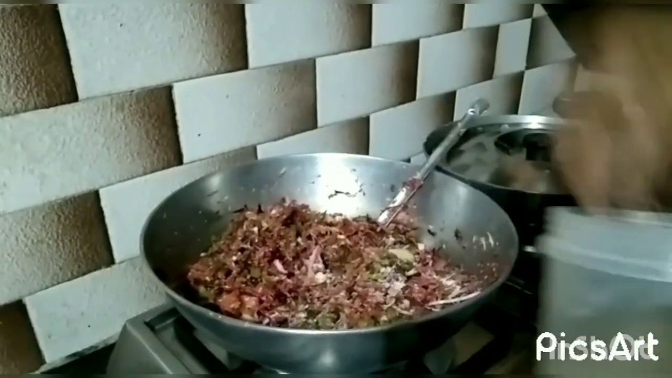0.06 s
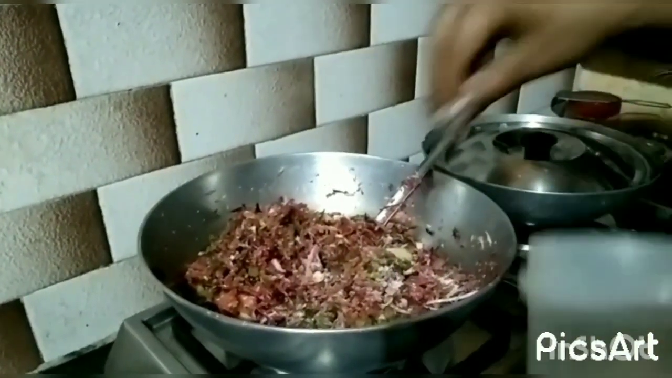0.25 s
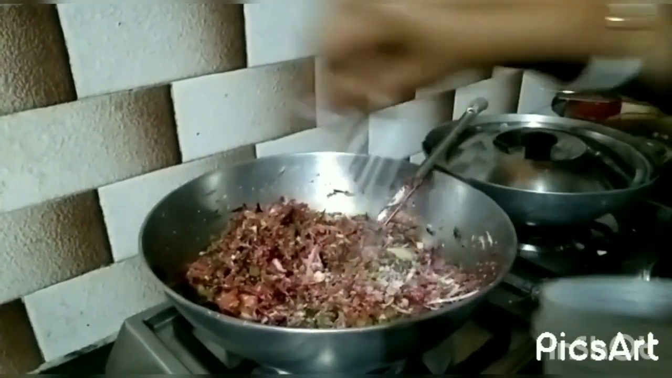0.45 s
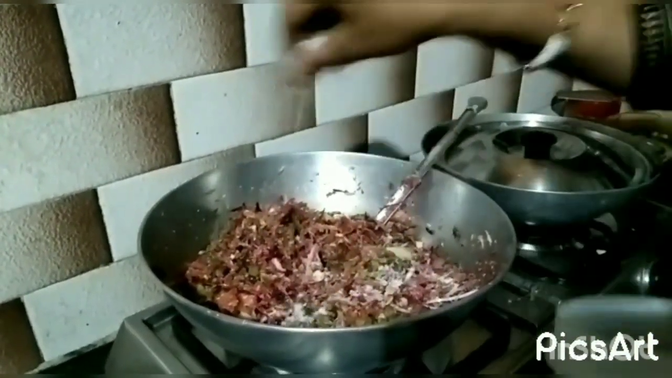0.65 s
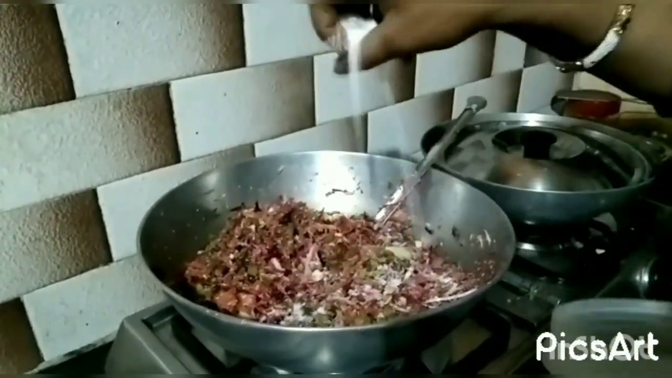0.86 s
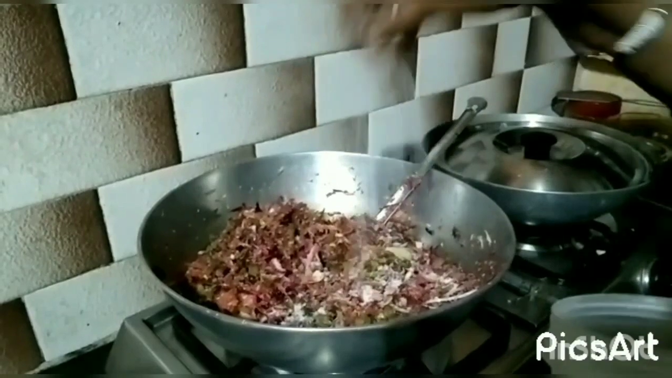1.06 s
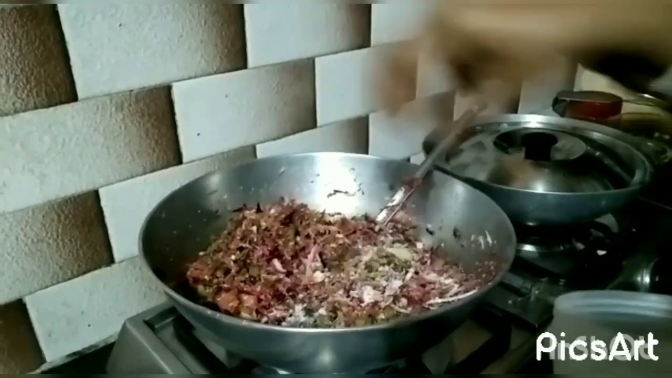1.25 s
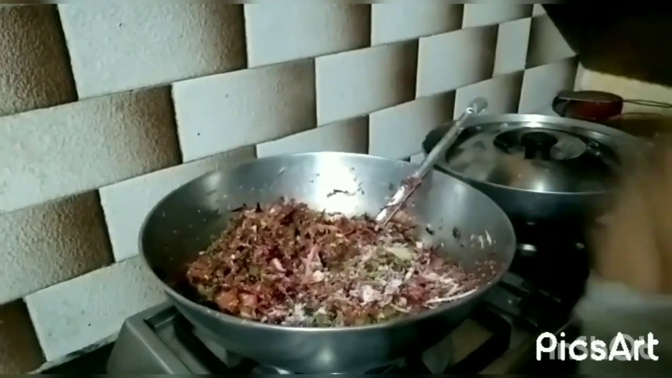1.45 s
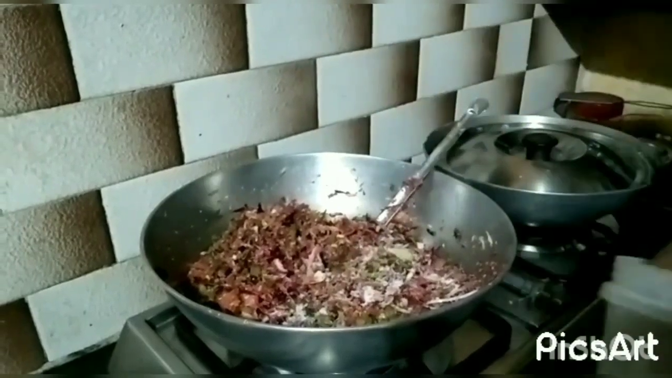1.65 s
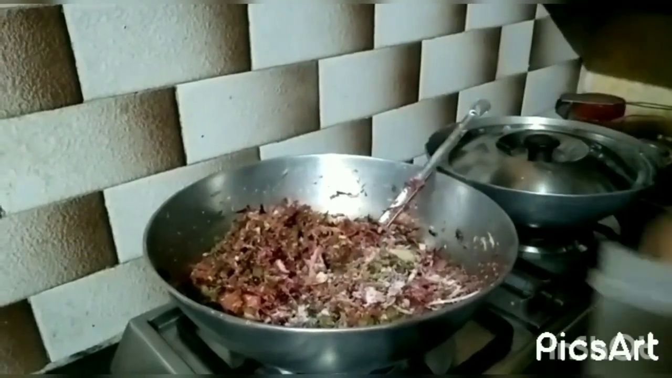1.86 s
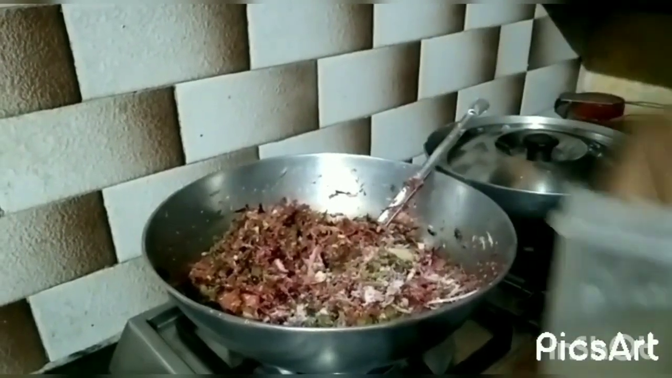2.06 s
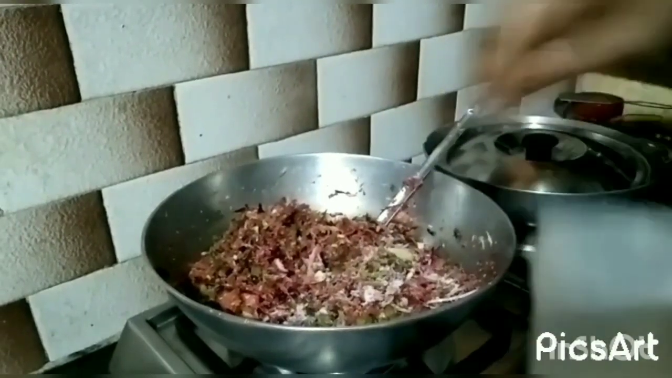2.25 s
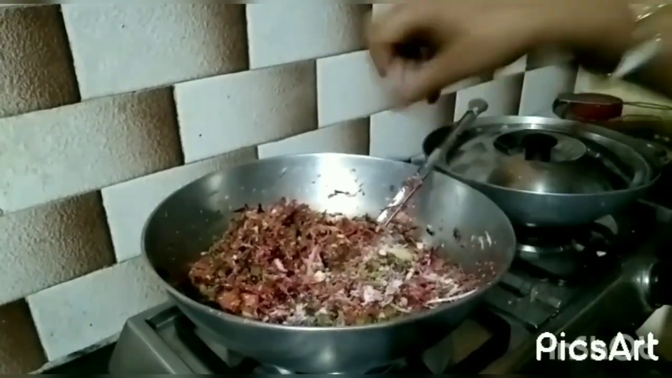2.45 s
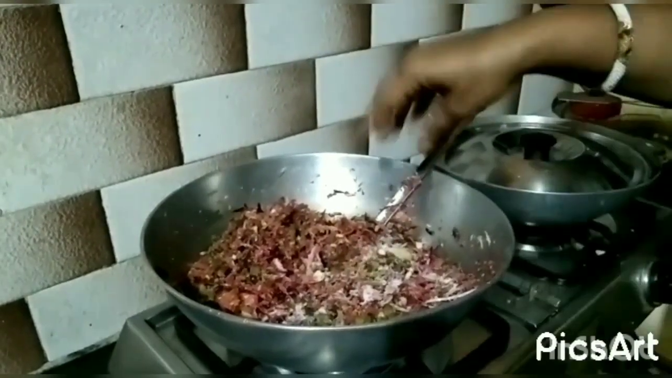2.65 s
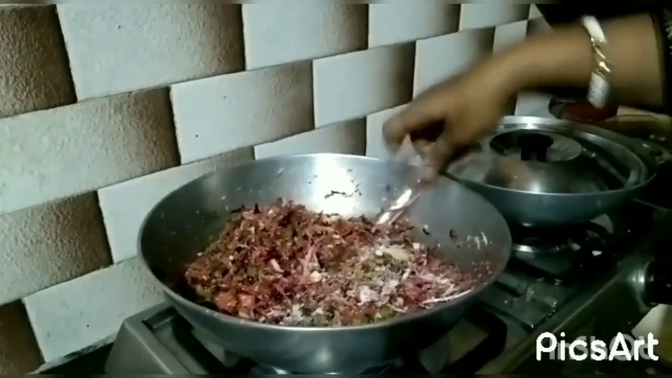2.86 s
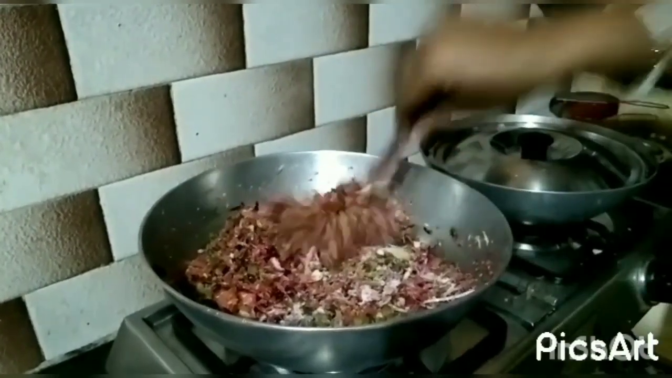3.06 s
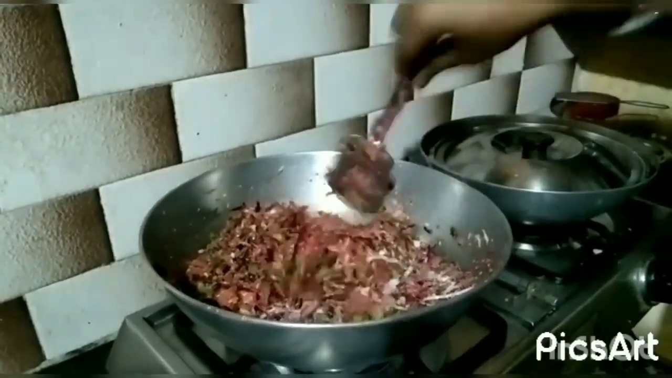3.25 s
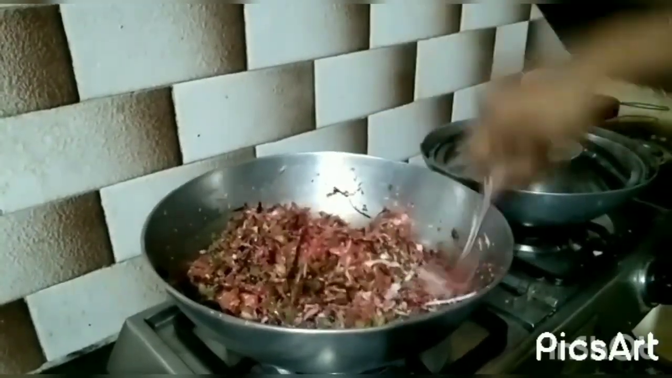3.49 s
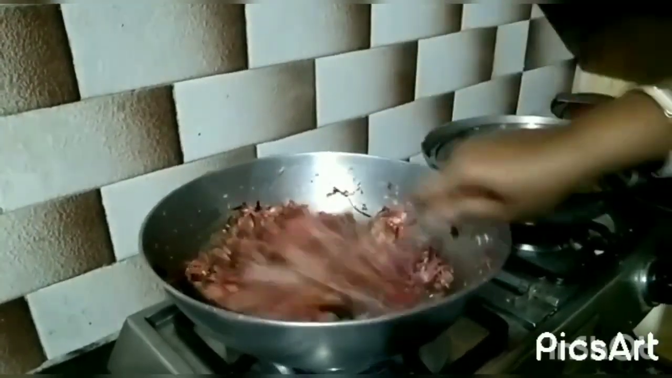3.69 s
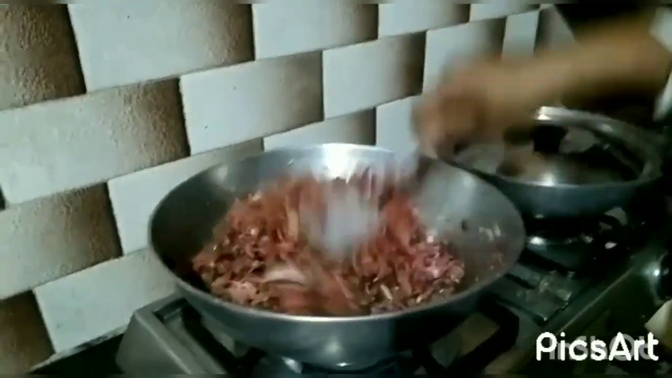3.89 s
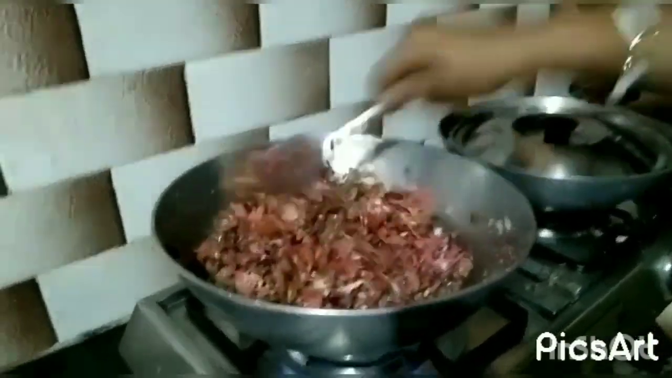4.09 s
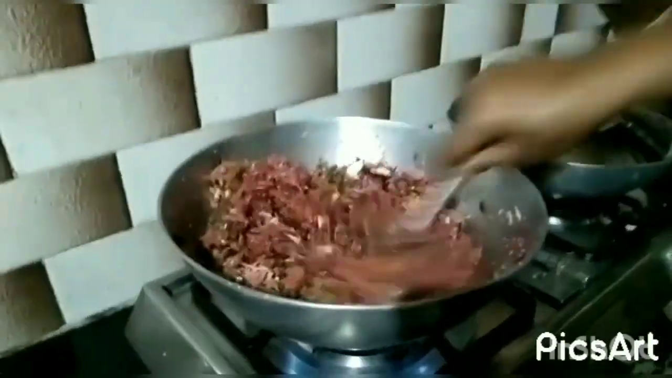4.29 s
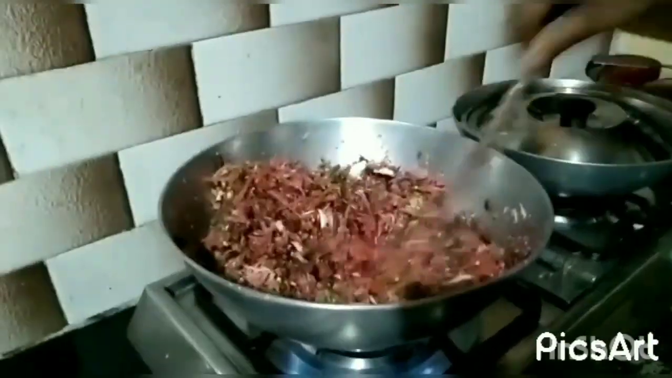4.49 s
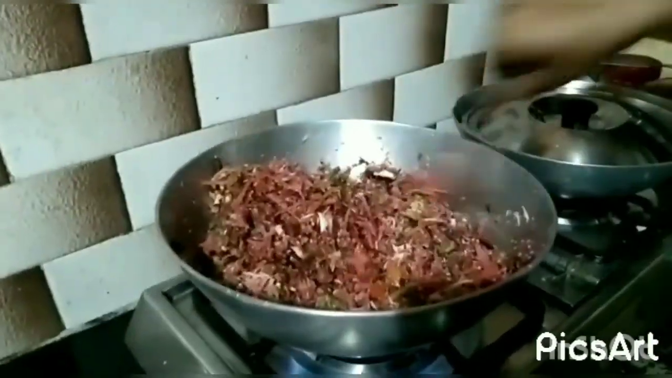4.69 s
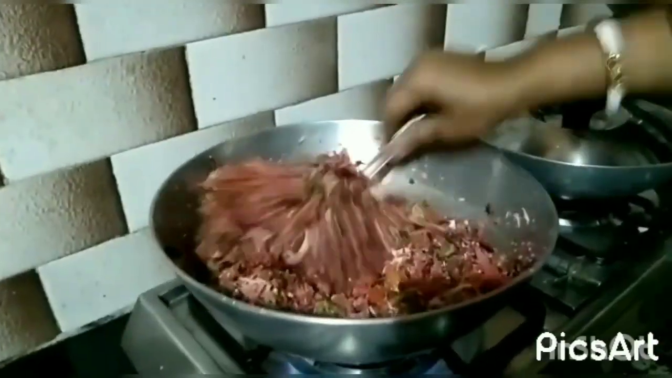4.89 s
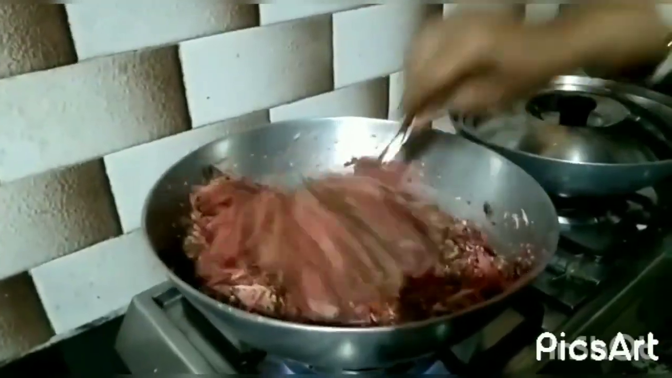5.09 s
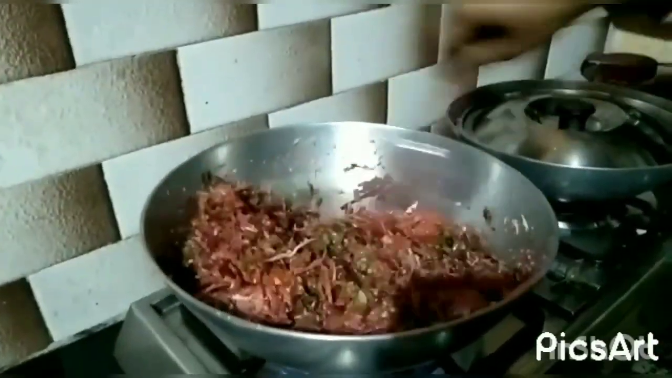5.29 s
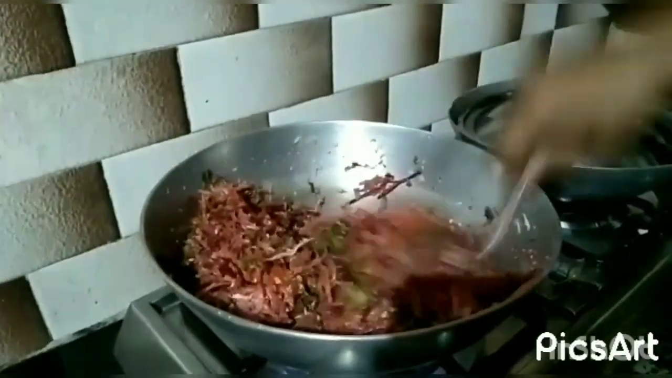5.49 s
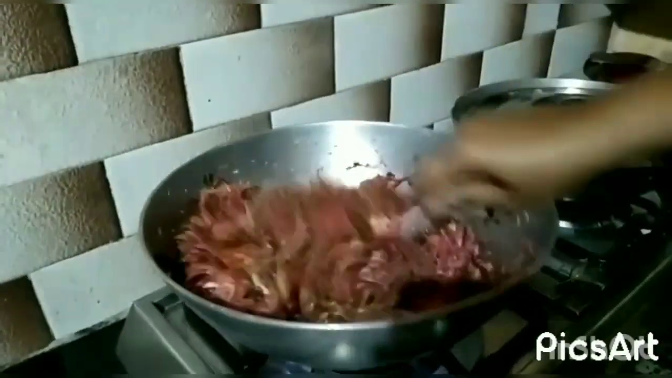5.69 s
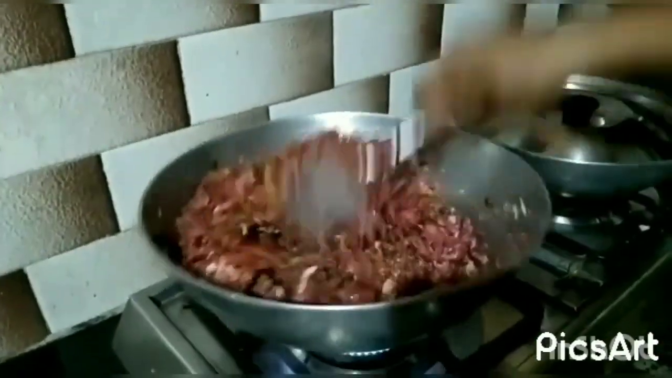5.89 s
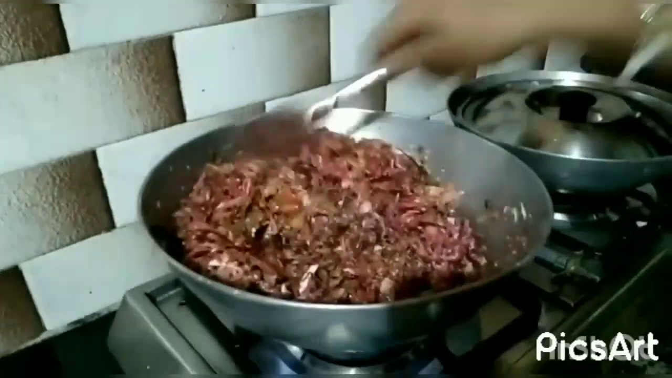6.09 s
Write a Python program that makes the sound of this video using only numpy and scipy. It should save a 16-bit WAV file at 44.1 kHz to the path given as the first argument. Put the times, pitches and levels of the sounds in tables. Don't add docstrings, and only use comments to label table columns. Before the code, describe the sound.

From 0 to 3 seconds, vegetables fry in a metal pan with a dense, bright, gently gusting hiss, dipping slightly near 2.4. Low burner air and faint mains hum lie underneath. At 3.0 and 3.3 two hollow, dull pan knocks stand out. A soft gritty scrape with small metallic ticks rises and fades from 3.55 to 3.9; a short falling one follows at 4.05. The sizzle is now stronger. Light taps come at 4.45 and 4.6, the latter with a brief touch of the blade. At 4.85 the spatula lands hard, rasping and chattering in high ringing tones until 5.2. The sharpest strike comes at 5.53, its scrape stuttering to 5.9. Around 6.0 a fast cluster of bright steel clinks rings the bowl, then a last sharp scrape tick at 6.14 over the loudest sizzle. Close sound, short hard kitchen echo.

```python
import sys
import numpy as np
from scipy import signal
from scipy.io import wavfile
from scipy.ndimage import uniform_filter1d, minimum_filter1d

SR = 44100
rng = np.random.default_rng(int(sys.argv[2]) if len(sys.argv) > 2 else 0)


def decibels_to_gain(level_db):
    exponent = np.asarray(level_db, float) / 20
    return 10 ** exponent


def store_wav(level_fs):
    pcm = np.round(np.clip(np.atleast_2d(level_fs), -1, 1) * 32767)
    wavfile.write(sys.argv[1], SR, pcm.T.astype(np.int16))


N = 270774


def evened(x):
    return x / np.sqrt(np.mean(x ** 2) + 1e-20)


def read(points, hz):
    f, value = np.transpose(points)
    return np.interp(np.log(hz + 1), np.log(f + 1), value)


def coloured(x, points):
    gain_db = read(points, abs(np.fft.fftfreq(8192, 1 / SR)))
    log_gain = np.log(decibels_to_gain(np.maximum(gain_db, -100)))
    taps = np.fft.ifft(np.exp(np.conj(signal.hilbert(log_gain)))).real[:4096]
    return signal.oaconvolve(x, taps / np.linalg.norm(taps))[:N]


def ring(x, hz, width):
    pole = np.exp((2j * np.pi * hz - np.pi * np.clip(width, 3, 2000)) / SR)
    return signal.lfilter([1], [1, -pole], x + 0j).imag


def glide(x, hz, width):
    turn = np.exp(2j * np.pi * np.cumsum(hz) / SR)
    r = np.exp(-np.pi * width / SR)
    return 2 * (turn * signal.lfilter([1 - r], [1, -r], x / turn)).real


def grit(per_s, spread_db):
    size = decibels_to_gain(spread_db * np.minimum(rng.exponential(1, N), 5)) * rng.choice([-1., 1.], N)
    return evened(size * (rng.random(N) < per_s / SR))


def drift(seconds):
    size = max(int(seconds * SR), 2)
    return evened(uniform_filter1d(uniform_filter1d(rng.standard_normal(N), size), size))


def sizzle_level_db():
    # (time [s], level [dB])
    heat = [
        (0.0, -32),
        (2.44, -32.5),
        (3.38, -31),
        (4.1, -29.5),
        (4.9, -30),
        (5.2, -30),
        (6.14, -29),
    ]
    return np.interp(np.arange(N) / SR, *np.transpose(heat))


def sizzle(level_db):
    # (frequency [Hz], level [dB per Hz])
    fizz = [(600, -41), (1000, -18), (1330, -19), (1690, -8), (2450, -4.5), (2850, -4), (3190, 0),
            (4300, 0), (5250, 1), (6420, -3), (8330, -16), (10900, -19), (13000, -35.5), (15600, -39)]
    bursts = evened(0.99 * rng.standard_normal(N) + 0.5 * grit(per_s=2500, spread_db=2.5))
    gusts_db = 0.44 * drift(0.022) + 0.083 * drift(0.1)
    return decibels_to_gain(level_db - 1.9) * coloured(bursts * decibels_to_gain(gusts_db), fizz)


def strokes():
    # (time [s], pressure [dB], pitch favoured by the blade's place [Hz], flexing [Hz])
    scrapes = [
        [(3.545, -46, 5450, 1680), (3.57, -40, 5480, 1740), (3.63, -30, 5480, 1740), (3.72, -38.5, 5280, 1690),
         (3.78, -36.5, 5040, 1560), (3.9, -56, 4500, 1560)],
        [(4.034, -29.5, 4640, 1700), (4.085, -43, 4560, 1680), (4.16, -41, 3700, 1710)],
        [(4.56, -45, 4500, 1700), (4.605, -33.5, 4560, 1760), (4.64, -58, 4600, 1750)],
        [(4.855, -21, 5480, 1690), (4.875, -29.5, 5480, 1660), (4.92, -34, 5430, 1650),
         (4.955, -29, 5480, 1670), (4.975, -25.5, 4780, 1720), (5.01, -32.5, 4770, 1730),
         (5.07, -33.5, 4770, 1640), (5.11, -33, 4130, 1790), (5.22, -47.5, 3700, 1760)],
        [(5.527, -20.5, 5480, 1800), (5.545, -23, 5480, 1820), (5.58, -31.5, 5480, 1850),
         (5.64, -27, 5400, 1860), (5.69, -31.5, 4700, 1640), (5.75, -32, 5100, 1540), (5.815, -32, 5350, 1740),
         (5.845, -35, 4770, 1750), (5.92, -46, 4770, 1780)],
    ]
    sheen_start_db, sheen_per_db, sheen_fade_db_per_s, sheen_least_db = -13.5, 0.93, 70, -24
    flex_from_db, flex_to_db, flex_after_s, flex_rise_s = -26, -18, 0.18, 0.02
    t = np.arange(N) / SR
    pressure = np.zeros(N)
    # place [Hz], flexing [Hz], sheen [dB], flexing [dB]
    controls = np.outer([5400., 1700., -13.0, -29.], np.ones(N))
    for rows in scrapes:
        s, db, place_hz, flex_hz = np.transpose(rows)
        on = (t > s[0]) & (t < s[-1])
        age = t[on] - s[0]
        pressure[on] = decibels_to_gain(np.interp(t[on], s, db)) * signal.windows.tukey(on.sum(), 0.06)
        landing_db = sheen_per_db * (db[0] + 27.5) * np.exp(-age / 0.08)
        dulling_db = sheen_fade_db_per_s * np.maximum(age - 0.08, 0)
        sheen_db = np.maximum(sheen_start_db + landing_db - dulling_db, sheen_least_db)
        load_s = min(flex_after_s, (s[-1] - s[0]) / 3)
        loaded = 1 / (1 + np.exp((load_s - age) / flex_rise_s))
        flex_db = flex_from_db + (flex_to_db - flex_from_db) * loaded
        controls[:, on] = [np.interp(t[on], s, place_hz), np.interp(t[on], s, flex_hz), sheen_db, flex_db]
    return pressure, controls


def edge_slips(centre_hz, sheen_db):
    # (time [s], peak [dB], favoured pitch [Hz])
    slip_events = [(3.2924, -24, 5420), (3.567, -18.5, 5550), (3.5844, -20.5, 5370), (3.6197, -20, 5430),
                   (3.6313, -18, 5600), (3.6425, -13, 5600), (3.66, -22, 5460), (3.8501, -16.5, 3730),
                   (4.0382, -15, 4580), (4.5794, -24, 4620), (4.8574, -9.5, 5640), (4.8654, -14, 5700),
                   (4.9573, -17, 5560), (4.9864, -13, 5500), (5.0325, -16, 4770), (5.0598, -17, 4770),
                   (5.0809, -12, 4600), (5.1144, -18, 6130), (5.1887, -19, 3850), (5.5288, 3.5, 5370),
                   (5.5425, -6, 5500), (5.6236, -9, 5930), (5.6647, -16, 5200), (5.7064, -11, 5230),
                   (5.81, -15, 5450), (5.8288, -7.5, 4600), (5.846, -10, 4700), (6.1364, -1, 4410)]
    tick_db, tick_per_db, dull_sheen_db = -34.0, 1.01, -24
    slips, ticks = np.zeros((2, N + 400))
    slip_hz = centre_hz.copy()
    u = np.arange(400) / 36.0
    skids = rng.standard_normal((len(slip_events), 400)) * u * np.exp(1 - u)
    for (s, db, hz), skid in zip(slip_events, skids):
        at = round(s * SR) - 20
        shine_db = tick_per_db * (sheen_db[at + 20] - dull_sheen_db)
        slips[at:at + 400] += decibels_to_gain(db - 11.0) * skid
        ticks[at:at + 400] += decibels_to_gain(db + tick_db + shine_db) * skid
        slip_hz[at:at + 400] = hz
    return slips[:N], ticks[:N], slip_hz


def favoured(hz, centre_hz, octaves):
    return 0.13 + np.exp(-(np.log2(hz / centre_hz) / octaves) ** 2)


def spatula():
    # (frequency [Hz], width [Hz], level [dB])
    blade_modes = [(3243, 78, 1.5), (3700, 51, -8), (4560, 720, -0.5), (4770, 58, -2), (5140, 160, -10),
                   (5360, 140, -4.5), (5510, 83, -1), (5880, 33, -9.5), (6460, 98, -5), (6780, 99, 2.5),
                   (7400, 50, 0), (7630, 45, 1), (8940, 120, -30), (10170, 97, -8), (10230, 85, -6.5)]
    # (favoured pitch [Hz], level [dB])
    ring_at = [(4500, -1), (4770, 1.5), (5050, -8), (5480, -1)]
    # (frequency [Hz], level [dB per Hz])
    sheen_colour = [(5000, -23.5), (7000, 13), (8500, 3.5), (9300, -8), (11000, -1), (13000, -19),
                    (15600, -20.5)]
    # (frequency [Hz], level [dB])
    microphone = [(800, -6), (2500, -0.5), (6000, 3.5), (7500, -1), (10000, 1.5), (13000, -11),
                  (15600, -14)]
    pressure, (centre_hz, flex_hz, sheen_db, flex_db) = strokes()
    slips, ticks, slip_hz = edge_slips(centre_hz, sheen_db)
    drag = pressure * decibels_to_gain(2.1 * drift(0.0037)) * grit(per_s=4000, spread_db=-1.0)

    rasp = decibels_to_gain(5.0) * glide(glide(drag + 0.49 * slips, slip_hz, 2000.0), slip_hz, 2500.0)
    sheen = coloured(decibels_to_gain(sheen_db + 6.5) * drag + ticks, sheen_colour)
    flex_drive = decibels_to_gain(flex_db + 22.5) * drag
    flexing = 1.34 * glide(flex_drive, flex_hz, 42.0) + 1.47 * glide(flex_drive, 2 * flex_hz, 110.0)

    blade = rasp + flexing
    ring_db = read(ring_at, centre_hz)
    for k, (hz, width, db) in enumerate(blade_modes):
        rub = decibels_to_gain(4.5 + ring_db) * np.sqrt(width / SR) * drag * favoured(hz, centre_hz, 0.057)
        kick = 0.18 * slips * favoured(hz, slip_hz, 0.098)
        blade += (-1) ** k * decibels_to_gain(db) * ring(rub + kick, hz, width)
    return decibels_to_gain(1.5) * coloured(blade, microphone) + sheen


def knocks():
    # (time [s], blow [dB], steel ring against thud [dB], crack against thud [dB], length [ms])
    blows = [(3.0051, -17, -17, -14, 0.21), (3.2718, -15.5, -11, -19, 2.1), (3.291, -31.5, -19, -28, 0.56),
             (3.85, -43.5, 7, -10, 0.33), (4.038, -32.5, -2, 3, 0.73), (4.447, -34.5, -4, 4, 1),
             (4.579, -35.5, 3.5, 5.5, 0.75), (5.188, -40.5, 5, 6, 0.33), (5.239, -40, -1, -10, 0.19),
             (5.531, -41, 4, -10, 0.35), (5.84, -39, 4.5, 0, 0.51), (5.9958, -29, 13.5, 18, 0.23),
             (6.0018, -26.5, 8, 15.5, 0.31), (6.0071, -29.5, 13.5, 3, 0.17), (6.0164, -33, 17, -5, 0.16),
             (6.031, -41, 6, 18, 0.14), (6.049, -37, 9, 17.5, 0.14)]
    # (frequency [Hz], width [Hz], level [dB])
    thud_modes = [(160, 25, -5.5), (258, 24, -3.5), (314, 42, -10.5), (402, 50, -12), (550, 126, 7),
                  (734, 65, 2), (890, 87, -3), (1090, 69, -5), (1280, 160, -2), (1440, 93, -8),
                  (2586, 134, 11), (4500, 740, 11)]
    # (frequency [Hz], width [Hz], level [dB])
    bowl_modes = [(264.3, 17.5, -3.5), (309.4, 24, -5.5), (464, 6.1, -4.5), (557, 63, -2), (650.4, 17, -6),
                  (716, 21, -4.5), (782, 25, 0), (1113, 28, -10.5), (1310, 34, -20), (1553, 18, -2.5),
                  (1820, 23, -2), (1970, 24, -16), (2010, 49, -17), (2525, 50, 6.5), (3140, 68, 1.5),
                  (3390, 60, 7), (3450, 30, -17), (3630, 30, 4)]
    # (frequency [Hz], level [dB per Hz])
    crack_colour = [(530, -39), (900, -4.5), (1650, -8), (1790, -6.5), (2770, -8.5), (3330, -7.5),
                    (3610, -5), (5780, -13), (14000, -52)]
    damping = 1.02
    thud, steel, crack = np.zeros((3, N))
    splinters = rng.standard_normal((len(blows), 600)) * np.exp(-np.arange(600) / 180.0)
    for (s, db, ring_db, crack_db, ms), burst in zip(blows, splinters):
        at = round(s * SR)
        u = np.arange(600) / (max(ms, 0.03) * SR / 1000)
        push = u * np.exp(-2 * u)
        push /= push.sum()
        thud[at:at + 600] += decibels_to_gain(db) * push
        steel[at:at + 600] += decibels_to_gain(db + ring_db) * push
        crack[at:at + 600] += decibels_to_gain(db + crack_db) * burst
    out = coloured(crack, crack_colour)
    for k, (hz, width, db) in enumerate(thud_modes):
        out += (-1) ** k * decibels_to_gain(db) * ring(thud, hz, width)
    for k, (hz, width, db) in enumerate(bowl_modes):
        out += (-1) ** k * decibels_to_gain(db - 1.5) * ring(steel, hz, damping * width)
    low_cut = signal.butter(3, 130, "high", fs=SR, output="sos")
    return signal.sosfilt(low_cut, out)


def stove_air(level_db):
    # (frequency [Hz], level [dB per Hz])
    stove = [(15, -37), (30, -22), (55, -7.5), (80, -6.5), (124, -11), (161, -4.5), (260, -10),
             (350, -13.5), (640, -6.5), (885, -10), (1600, -9), (2100, -36.5)]
    stove_db, rest_db, rustle_per_db = -49.5, -32, 0.8
    flutter = rng.standard_normal(N) * decibels_to_gain(1.15 * drift(0.027))
    return decibels_to_gain(stove_db + rustle_per_db * (level_db - rest_db)) * coloured(flutter, stove)


def hum():
    # (frequency [Hz], level [dB])
    tones = [
        (100, -55),
    ]
    t = np.arange(N) / SR
    return sum(np.sqrt(2) * decibels_to_gain(db + 1.3 * drift(0.04)) * np.sin(2 * np.pi * hz * t) for hz, db in tones)


def kitchen(x):
    # (frequency [Hz], time to fall 60 dB [s])
    decay = [(150, 0.3), (700, 0.29), (3000, 0.2), (9000, 0.15)]
    taps = np.zeros(SR // 2)
    at = np.arange(120, SR // 2 - 20, 20)
    taps[at + rng.integers(0, 20, len(at))] = rng.choice([-1., 1.], len(at))
    hz, t, z = signal.stft(taps, SR, nperseg=256)
    fade = decibels_to_gain(-60 * t / read(decay, hz)[:, None])
    tail = signal.istft(z * fade, SR, nperseg=256)[1]
    return signal.fftconvolve(x, tail / np.linalg.norm(tail))[:N]


def spread(mono):
    # (time [s], centre [Hz])
    moments = [(0.24, 8700), (1.42, 6500), (1.61, 6200), (2.19, 5430), (2.58, 5100), (2.75, 8900),
               (2.86, 7100), (3.96, 8950), (4.0, 9200), (5.489, 5440), (5.74, 5500), (0.24, 11000),
               (0.98, 13100), (2.19, 9500), (2.75, 13000), (2.86, 9700), (3.96, 12400), (4.81, 11900),
               (5.51, 11000)]
    octaves = 0.17
    side, size = np.zeros(N), round(0.046 * SR)
    for s, hz in moments:
        at = round(s * SR) - size // 2
        edges_hz = hz * 2. ** (octaves * np.array([-1, 1]))
        band = signal.butter(6, edges_hz, "band", fs=SR, output="sos")
        earlier = signal.sosfilt(band, mono[at - 2 * size:at])[size:]
        side[at:at + size] += earlier * np.hanning(size)
    return decibels_to_gain(-2) * np.array([side, -side])


def scene():
    level_db = sizzle_level_db()
    food = sizzle(level_db) + stove_air(level_db)
    blade = spatula()
    pan = knocks()
    echo = kitchen(decibels_to_gain(-13.5) * food + decibels_to_gain(-6.5) * blade + decibels_to_gain(-4.5) * pan)
    mono = 0.97 * food + blade + pan + hum() + echo
    return np.array([mono, mono])


def roll_off(x):
    return signal.sosfilt(signal.butter(12, 15390, fs=SR, output="sos"), x)


def record(dry):
    limit_db, look_ahead_s, edge_hz = -8.5, 0.0079, 15500
    size = round(look_ahead_s * SR)
    peak_db = 20 * np.log10(abs(dry).max(0) + 1e-9)
    room_db = np.minimum(limit_db - peak_db, 0)
    turn_down_db = 0.39 * uniform_filter1d(minimum_filter1d(room_db, 2 * size), size)
    limited = (dry + spread(dry[0])) * decibels_to_gain(turn_down_db)
    low_pass = signal.firwin(511, edge_hz, window=("kaiser", 9), fs=SR)
    return roll_off(signal.oaconvolve(limited, low_pass[None], "same"))


dry = scene()
out = record(dry)
store_wav(out)
```